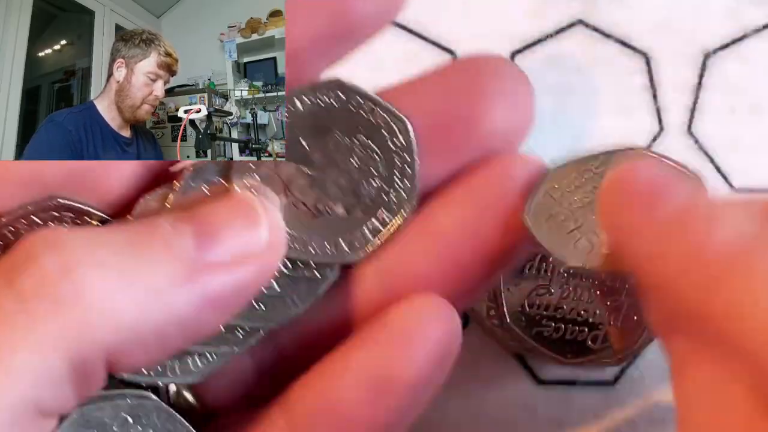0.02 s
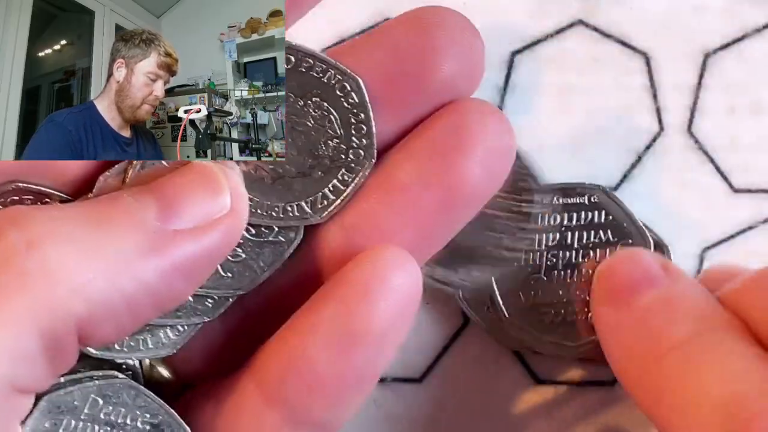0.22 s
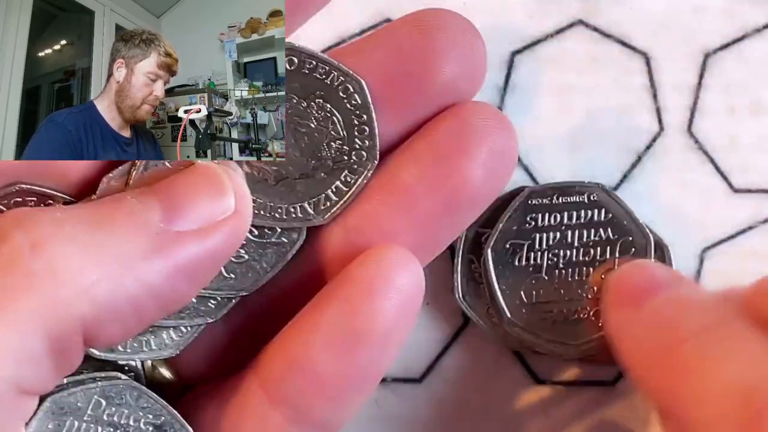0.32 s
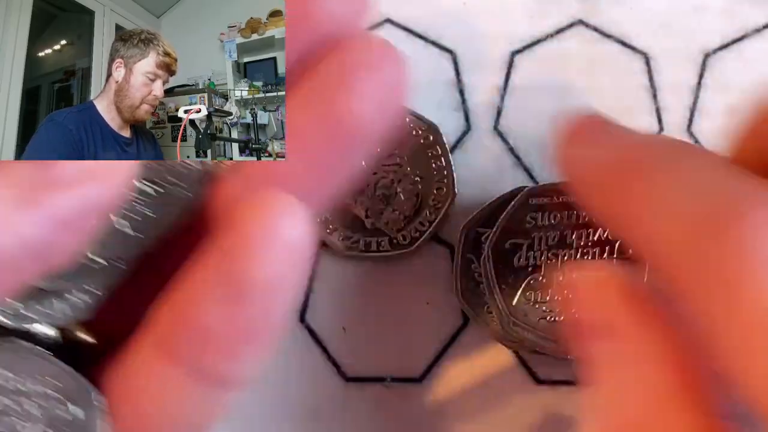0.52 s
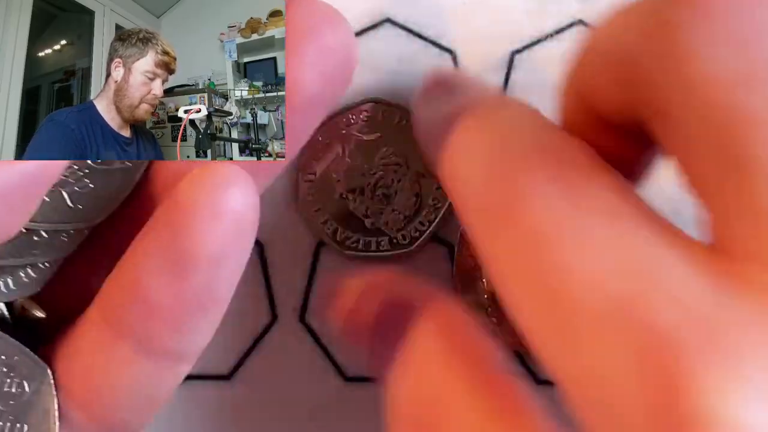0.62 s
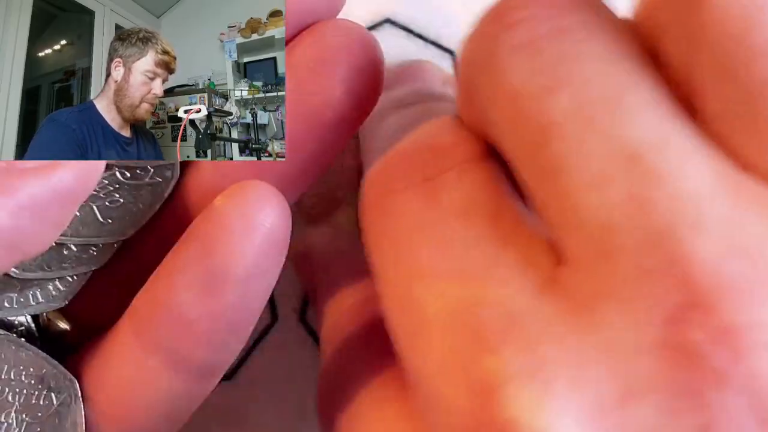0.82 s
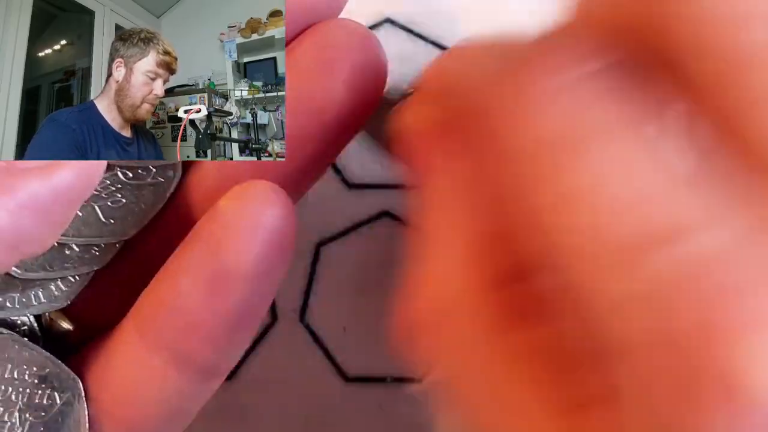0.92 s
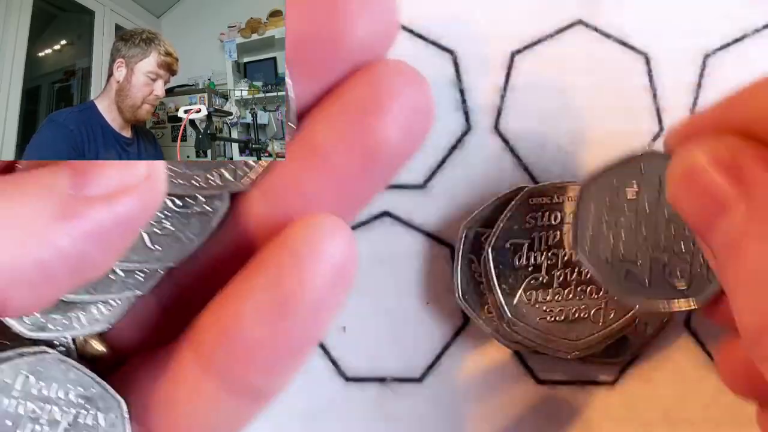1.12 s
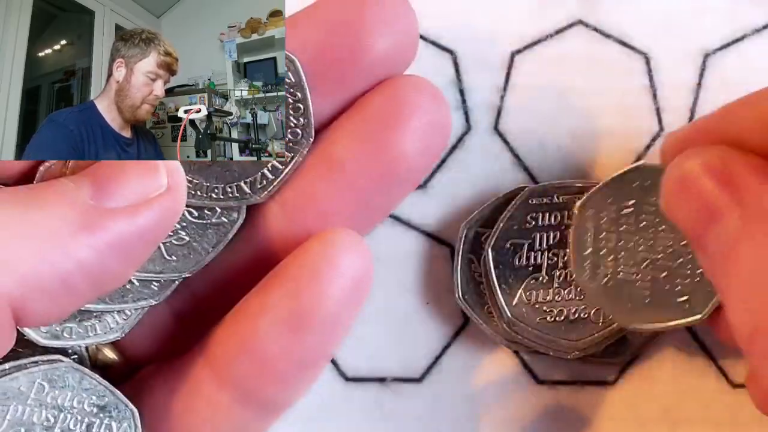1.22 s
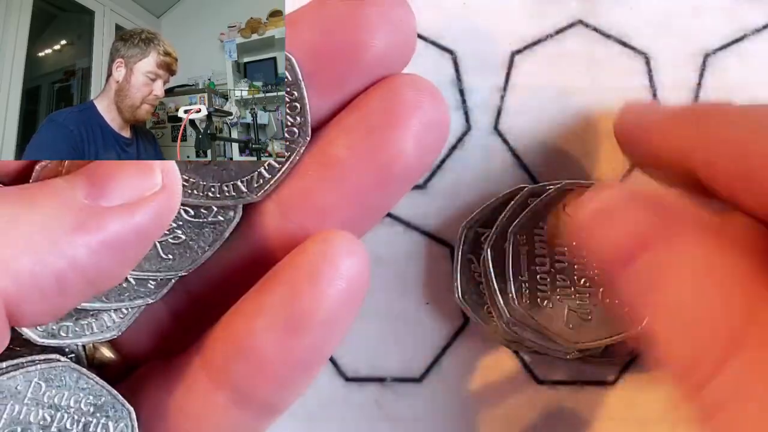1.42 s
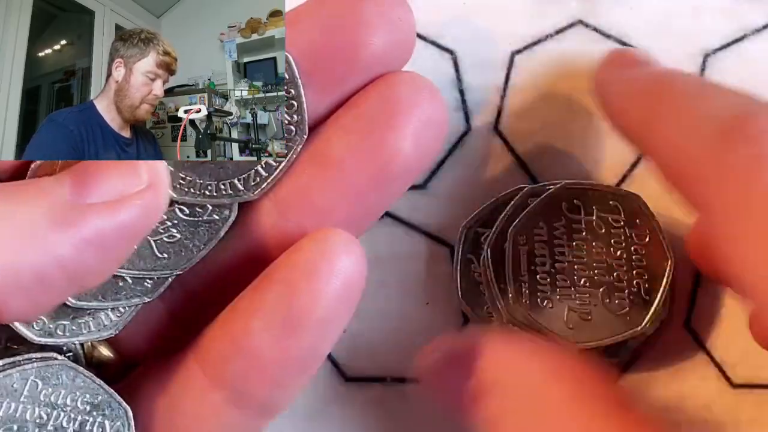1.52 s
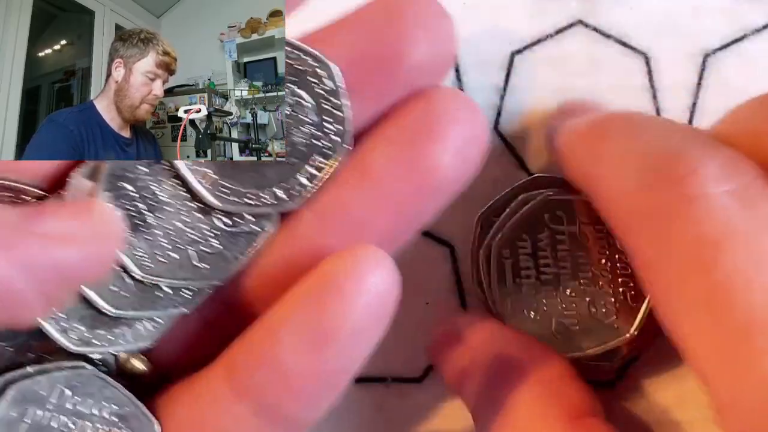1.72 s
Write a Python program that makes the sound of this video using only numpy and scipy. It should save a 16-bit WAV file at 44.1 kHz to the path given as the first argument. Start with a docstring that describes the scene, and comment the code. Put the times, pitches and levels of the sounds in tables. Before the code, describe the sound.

Metal coins clink close up as they are stacked by hand. From 0.2 to 0.4 seconds they clatter and scrape sharply on the pile, lightly thumping the desk. Between 0.5 and 1.2 seconds a coin slides softly over paper with small dull ticks. Clinks and scrapes return at 1.3 seconds, peaking around 1.4, and light clinks follow near 1.7. The small room has a faint hiss and hum.

```python
"""Coins are stacked by hand on a sheet of paper on a desk, close up in a small room with faint hiss and hum.
A clink fades at the start. From 0.2 s coins crack, chatter and scrape on the pile; the harder blows
thump the desk, and finger presses stop the ring. From 0.5 s fingers slide a coin over the paper and
pick it up with small dull ticks. From 1.3 s coins clink and scrape again, loudest at 1.43 s,
and a few light clinks follow near 1.7 s."""
import sys
import numpy as np
from scipy import signal
from scipy.io import wavfile

SR = 44100
rng = np.random.default_rng(int(sys.argv[2]) if len(sys.argv) > 2 else 0)


def dump(signal):
    """Clip the signal to [-1, 1] and save it as 16-bit WAV at the path in sys.argv[1]."""
    limited = np.clip(np.atleast_2d(signal).T, -1, 1)
    pcm = np.round(limited * 32767).astype(np.int16)
    wavfile.write(sys.argv[1], SR, pcm)


N = 77175
LEAD = round(0.1 * SR)  # samples before time zero


def amp(db):
    """Decibels to gain."""
    return 10 ** (np.asarray(db) / 20)


def unit_rms(x):
    """Scales to rms 1."""
    return x / np.sqrt(np.mean(x ** 2) + 1e-20)


def unit_energy(x):
    """Scales to energy 1."""
    return x / (np.linalg.norm(x) + 1e-20)


def seconds(count=12000):
    """Time axis of one event."""
    return np.arange(count) / SR


def value_at(points, hz):
    """Interpolates (Hz, value) points over log frequency."""
    point_hz, values = np.transpose(points)
    return np.interp(np.log(hz + 1), np.log(point_hz + 1), values)


def tilted(spectrum, db_per_octave):
    """Brightens or dulls a spectrum."""
    return [(hz, db + db_per_octave * np.log2(hz / spectrum[0][0])) for hz, db in spectrum]


def colour(x, spectrum, size=2048):
    """Minimum-phase filter of unit energy with the given spectrum."""
    log_gain = np.log(amp(value_at(spectrum, abs(np.fft.fftfreq(size, 1 / SR)))))
    taps = np.fft.ifft(np.exp(np.conj(signal.hilbert(log_gain)))).real[:size // 2]
    return signal.fftconvolve(x, unit_energy(taps))[:len(x)]


def play(source, rows):
    """Mixes source(*settings) in at each row's start."""
    mix = np.zeros(LEAD + N)
    for start_s, *settings in rows:
        sound = source(*settings)
        part = mix[max(LEAD + round(start_s * SR), 0):][:len(sound)]
        part += sound[:len(part)]
    return mix


def impacts(decay_s, rise_s=0.00054):
    """Spiky micro-impacts of one contact, dying quickly."""
    t = seconds()
    fade = np.exp(-t / decay_s)
    rise = 1 - np.exp(-t / rise_s)
    noise = rng.standard_normal(len(t))
    spike_db = np.minimum(rng.exponential(1, len(t)), 3)
    return unit_energy(noise * amp(spike_db) * fade * rise) * np.linalg.norm(fade)


def ring(drive, hz, t60_s):
    """One mode rung by impacts, scaled to the energy of a decaying sine of height 1."""
    decay_per_sample = np.log(1000) / (t60_s * SR)
    radius = np.exp(-decay_per_sample)
    feedback = [1, -2 * radius * np.cos(2 * np.pi * hz / SR), radius * radius]
    return unit_energy(signal.lfilter([1, 0, -1], feedback, drive)) / (2 * np.sqrt(decay_per_sample))


# Coins lying in the pile. Each row: mode in Hz, relative level in dB, t60 in seconds.
PILE_MODES = [(8497, -6, .09), (8600, -2, 0.15), (9144, 2, 0.05), (8950, -9, .03), (9630, -3.5, 0.03),
              (9500, -11.5, .035), (10870, -7.5, .04), (12340, -14.5, .03), (13900, -6, .045),
              (14250, 2, 0.042), (14690, 0, 0.032), (15020, -11, .03)]
def pile_ring(drive):
    """All coins of the pile ring together."""
    return sum(amp(db) * ring(drive, hz, t60_s) for hz, db, t60_s in PILE_MODES) / 2


# Rocking pile. Each row: mode in Hz, level in dB relative to the contact, t60 in seconds.
CLACK_MODES = [(3854, -25.5, 0.0092), (4285, -16, 0.0081), (5036, -17, .01), (5606, -16, 0.014),
               (6530, -18.5, 0.012)]
def clack(contact):
    """The pile rocks briefly on the desk."""
    modes = sum(amp(db) * unit_energy(ring(contact, hz, t60_s)) for hz, db, t60_s in CLACK_MODES)
    return modes * np.linalg.norm(contact)


# Finger presses on the pile. Each entry: time in seconds.
PRESSES_S = [.242, .309, .414, 1.454]
def finger_damping(start_s, decay_s=0.004):
    """Gain of a ring begun at start_s: free until the next press stops it."""
    free_s = min([press for press in PRESSES_S if press > start_s], default=np.inf) - start_s
    return np.exp(-np.maximum(seconds() - free_s, 0) / decay_s)


# Spectrum of coin contact. Each row: frequency in Hz, relative level in dB.
CRACK_SPECTRUM = [(60, -41), (500, -23), (900, -17), (1450, -13), (1950, -9.5), (2400, -5), (3300, -3.5),
                  (3900, -2), (5200, 0), (7700, -2), (8600, 5.5), (10200, 0.5), (11600, 2), (12500, -8),
                  (13400, -7.5), (14500, -9), (15600, 0.5), (16500, -29)]
# Coin on coin. Each row: start in seconds, crack level in dB, crack decay in seconds, crack tilt in
# dB per octave, pile ring in dB, struck coin's ring in dB, its pitch in Hz, its t60 in seconds.
COIN_HITS = [(-.05, -26.5, 0.0082, 1.5, -31.5, -46, 14500, 0.21),
             (0.165, -58.5, .005, -1, -63.5, -72.5, 14500, 0.024),
             (0.2137, -14, 0.0028, 2, -21.5, -18, 14410, 0.096),
             (.2435, -27, 0.0071, 0.5, -34, -42, 14530, 0.075),
             (0.2478, -22.5, 0.0011, -1.5, -29, -60, 14530, .03),
             (0.2707, -21.5, 0.0077, 19, -17.5, -28, 14450, .06),
             (.2760, -18, 0.0052, 18, -19, -37, 14540, .06),
             (0.2829, -20, 0.0048, 2.5, -42, -26, 14350, .06),
             (0.2919, -23, .003, 3.9, -32, -13, 14200, .08), (0.3015, -24, 0.0035, 0, -23, -23, 14130, .04),
             (0.3073, -20, .002, 7.5, -30, -34, 14380, 0.034),
             (0.349, -15.5, 0.0024, 16, -22.5, -41, 14450, 0.054),
             (.3518, -21, 0.0029, 1.5, -49, -18, 14200, 0.099),
             (0.367, -32.5, 0.0087, 1, -36, -44, 14450, 0.054),
             (.3780, -29.5, 0.0041, 14, -33, -36, 14570, .04), (0.392, -40, 0.0054, 6, -44, -46, 14200, .1),
             (0.413, -47, 0.0026, -5, -54, -54, 14200, .1),
             (1.3014, -36, 0.0037, -1, -43, -34.5, 14560, .04),
             (1.3790, -43.5, .002, -6.5, -64, -42, 14560, .02),
             (1.386, -40, 0.0027, -0.5, -51, -50, 14560, .02),
             (1.3974, -50.5, .002, -6.5, -55, -52.5, 14500, .02),
             (1.4084, -36, 0.0015, 0.5, -38, -45, 14200, 0.063),
             (1.421, -43, 0.0027, 1, -50, -37, 14300, .15),
             (1.4331, -21, 0.0036, 4, -27, -14, 14200, 0.046),
             (1.4510, -28.5, .003, 3, -36.5, -25, 14220, .025),
             (1.6831, -49, 0.0033, -2, -57, -59.5, 14550, .03),
             (1.699, -41.5, 0.0022, 0, -60.5, -56, 14550, 0.025),
             (1.7032, -39, 0.0024, 5, -68, -44, 14550, 0.026),
             (1.7260, -48, .002, -4.5, -53, -64, 14550, .03),
             (1.731, -34, 0.0039, -1, -53, -36, 14550, .04),
             (1.7388, -41, 0.0037, -0.5, -61, -52, 14550, .04),
             (1.7462, -43, 0.0045, -2, -50, -55, 14550, .04)]
def clink(start_s, crack_db, crack_s, tilt_db_per_octave, pile_db, coin_db, coin_hz, coin_t60_s):
    """A coin lands with a crack; its chatter rings both coin and pile."""
    contact = impacts(crack_s)
    chatter = impacts(decay_s=0.002)
    crack = colour(contact, tilted(CRACK_SPECTRUM, tilt_db_per_octave)) + clack(contact)
    main_mode = ring(chatter, coin_hz, coin_t60_s)
    low_mode = amp(-11.5) * ring(chatter, coin_hz / 1.698, coin_t60_s * 1.5)
    ringing = amp(pile_db) * pile_ring(chatter) + amp(coin_db) * (main_mode + low_mode)
    return amp(crack_db) * crack + finger_damping(start_s) * ringing


# Woody knock of the desk top. Each row: mode in Hz, relative level in dB, t60 in seconds.
DESK_MODES = [(590, -19, 0.041), (878, -15.5, 0.042), (1380, -20.5, .03)]
# Blows on the desk. Each row: start in seconds, level in dB, final pitch in Hz, shudder level in dB.
DESK_BLOWS = [(0.2149, -27.5, 199.4, -46), (0.245, -38, 250, -55), (0.275, -41.5, 222, -76),
              (0.298, -44, 200, -49), (.3462, -33, 201, -60), (0.386, -41, 209, -54),
              (0.928, -53.5, 260, -66), (1.079, -49, 271, -53.5), (1.117, -55, 162.5, -57.5),
              (1.153, -56.5, 202, -54.5), (1.4325, -45, 172, -49), (1.734, -56, 287, -67)]
def thump(db, final_hz, shudder_db):
    """The desk top knocks and bends, higher notes first, over a deep shudder."""
    sweep_hz, sweep_s, rise_s, decay_s = 480, 0.0026, 0.008, 0.004
    shudder_hz, shudder_peak_s = 85, 0.0038
    t = seconds()
    bend_hz = final_hz + sweep_hz * np.exp(-t / sweep_s)
    envelope = (1 - np.exp(-t / rise_s)) ** 2 * np.exp(-t / decay_s)
    bend = envelope / envelope.max() * np.sin(2 * np.pi * np.cumsum(bend_hz) / SR)
    knock = sum(amp(mode_db - 60 * t / t60_s) * np.sin(2 * np.pi * hz * t)
                for hz, mode_db, t60_s in DESK_MODES)
    shudder = t / shudder_peak_s * np.exp(1 - t / shudder_peak_s) * np.sin(2 * np.pi * shudder_hz * t)
    return amp(db) * (bend + knock) + amp(shudder_db) * shudder


def friction(length_s, edge_s, grains_per_s=1500):
    """Sparse grains over hiss, faded in and out as one stroke."""
    t = seconds()
    grain_db = 3 * np.minimum(rng.exponential(1, len(t)), 3)
    signs = rng.choice([-1, 1], len(t))
    catches = rng.random(len(t)) < grains_per_s / SR
    grains = unit_rms(amp(grain_db) * signs * catches)
    hiss = 1.4 * rng.standard_normal(len(t))
    envelope = np.clip(np.minimum(t, length_s - t) / edge_s, 0, 1)
    return unit_rms(grains + hiss) * envelope


# Coin over coin. Each row: start in seconds, length in seconds, level in dB.
COIN_SCRAPES = [(0.262, 0.019, -39), (1.317, 0.017, -55), (1.353, 0.027, -49), (1.421, 0.053, -51.5),
                (1.462, 0.0089, -60)]
def scrape(length_s, db):
    """The relief of one coin catches on another and keeps the pile ringing."""
    grains = friction(length_s, edge_s=0.0012)
    rasp = colour(grains, tilted(CRACK_SPECTRUM, db_per_octave=-1))
    ringing = amp(-7) * unit_energy(pile_ring(grains)) * np.linalg.norm(grains)
    return amp(db) * (rasp + ringing)


# Nail and coin edge. Each row: start in seconds, level in dB, decay in seconds, centre in Hz.
DULL_TICKS = [(0.5196, -37, 0.0016, 4730), (0.5929, -44.5, 0.0011, 3050), (0.6287, -57, .002, 1810),
              (0.683, -52, 0.0014, 5000), (0.6993, -39.5, 0.00047, 3500), (0.7038, -45.5, 0.0014, 3500),
              (0.7595, -34, 0.00088, 3470), (0.7863, -45.5, 0.0037, 3500), (0.8, -52.5, 0.0015, 3700),
              (0.8198, -47, 0.0029, 3680), (0.929, -58.5, .002, 2600), (.960, -59.5, 0.0025, 6050),
              (1.1160, -47.5, .0016, 2695), (1.2019, -44, 0.0015, 2590)]
def tick(db, decay_s, centre_hz):
    """A contact damped by the fingers: a broad noise band and a short hollow knock."""
    skirt_db, skirt_octaves = -6.5, 0.88
    band = [(hz, max(skirt_db * (np.log2(hz / centre_hz) / skirt_octaves) ** 2, -40))
            for hz in np.geomspace(100, SR / 2, 20)]
    contact = impacts(decay_s, rise_s=0.0001)
    knock = amp(-2) * ring(contact, hz=1632, t60_s=0.0089)
    return amp(db) * (colour(contact, band) + knock)


# Spectra of paper hiss and low rub. Each row: frequency in Hz, relative level in dB.
PAPER_SPECTRUM = [(200, -22), (900, 1), (1600, -0.5), (4000, -1.5), (7000, -10.5), (11000, -13.5),
                  (16000, -25)]
RUB_SPECTRUM = [(30, -7), (130, 10.5), (320, -5.5), (600, 2.5), (1200, 0.5), (3000, -31), (16000, -57.5)]
# Coin and fingers on paper. Each row: start in seconds, length in seconds, hiss level in dB,
# hiss tilt in dB per octave, rub level in dB.
PAPER_SLIDES = [(.52, .14, -60, 2, -72), (0.659, 0.2, -67, 1.5, -74), (0.877, 0.105, -69, -1, -71.5),
                (1.043, 0.065, -69, 8.5, -72), (1.11, .12, -63, -2.5, -66.5)]
def slide(length_s, hiss_db, tilt_db_per_octave, rub_db):
    """Paper hisses under the coin while the desk carries a low rub."""
    grains = friction(length_s, edge_s=0.012)
    hiss = colour(grains, tilted(PAPER_SPECTRUM, tilt_db_per_octave))
    return amp(hiss_db) * hiss + amp(rub_db) * colour(grains, RUB_SPECTRUM)


def early_reflections(x, echoes_per_s=3000, gap_s=0.001, decay_s=0.009):
    """Quick echoes off the hands, the desk and the things on it."""
    t = seconds(count=4096)
    echoes = rng.standard_normal(len(t)) * (rng.random(len(t)) < echoes_per_s / SR)
    taps = echoes * (t > gap_s) * np.exp(-t / decay_s)
    return signal.fftconvolve(x, unit_energy(taps))[:len(x)]


# Room decay. Each row: frequency in Hz, t60 in seconds.
ROOM_T60 = [(200, 0.24), (1000, 0.48), (4000, 0.23), (9000, 0.34), (15000, 0.22)]
def reverb(x, rise_s=0.01):
    """Diffuse tail, each band dying at its own speed."""
    hz, t, bands = signal.stft(rng.standard_normal(SR // 2), SR, nperseg=256)
    decay = amp(-60 * t / value_at(ROOM_T60, hz)[:, None])
    _, tail = signal.istft(bands * decay, SR, nperseg=256)
    rise = np.minimum(seconds(count=len(tail)) / rise_s, 1) ** 2
    return signal.fftconvolve(x, unit_energy(tail * rise))[:len(x)]


# Spectrum of room hiss. Each row: frequency in Hz, relative density in dB.
AIR_SPECTRUM = [(12, -33.5), (20, -7), (55, -2), (154, 3.5), (277, -0.5), (459, -7.5), (897, -10),
                (3840, -10), (6010, -19), (11100, -22.5), (13200, -31.5), (14700, -27), (16000, -31)]
# Hum envelope. Each row: time in seconds, rms level in dB.
HUM_LEVELS = [(0, -68.5), (.66, -78.5), (.78, -66.5), (1.1, -70), (1.25, -79.5), (1.52, -68.5), (1.75, -81)]
def room_tone(hiss_db=-63.5, hum_hz=50):
    """Faint steady hiss and a mains hum of wavering level."""
    t = seconds(count=N)
    hum_db = np.interp(t, *np.transpose(HUM_LEVELS))
    hum = np.sqrt(2) * np.sin(2 * np.pi * (hum_hz * t + rng.random()))
    hiss = colour(rng.standard_normal(LEAD + N), AIR_SPECTRUM, size=8192)[LEAD:]
    return amp(hiss_db) * unit_rms(hiss) + amp(hum_db) * hum


# Spectrum of the room's return. Each row: frequency in Hz, relative level in dB.
WALL_SPECTRUM = [(100, 2), (3500, 3), (9000, -1.5), (14000, -5)]
def scene():
    """Coins, fingers and desk in the room, mono."""
    coins = play(scrape, COIN_SCRAPES)
    coins += play(clink, [(hit[0], *hit) for hit in COIN_HITS])  # the start also sets the damping
    handling = play(tick, DULL_TICKS) + play(slide, PAPER_SLIDES)
    desk = play(thump, DESK_BLOWS)
    near = coins + handling + desk + amp(-9) * early_reflections(coins)
    far = amp(-15) * colour(reverb(coins + handling), WALL_SPECTRUM) + amp(-5.5) * reverb(desk)
    return ((near + far)[LEAD:] + room_tone())[None]


def record(dry):
    """Steep low-pass at 16.1 kHz."""
    lowpass = signal.firwin(255, 16100, window=("kaiser", 9), fs=SR)
    return signal.oaconvolve(dry, lowpass[None], "same")


dry = scene()
out = record(dry)
dump(out)
```